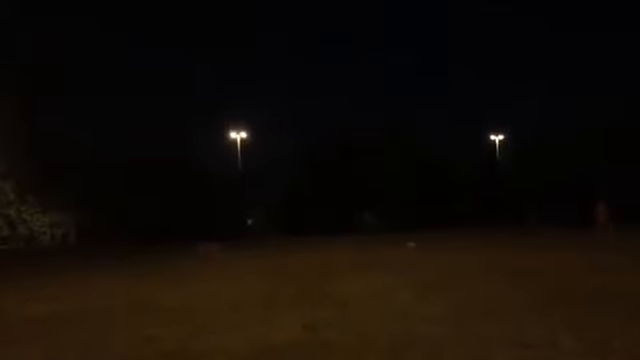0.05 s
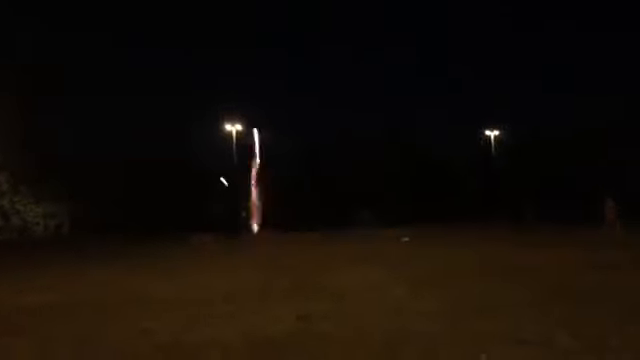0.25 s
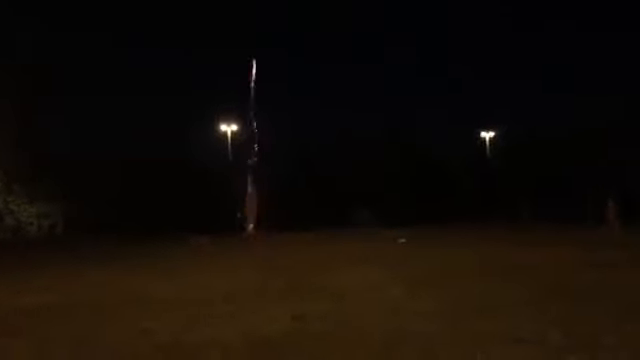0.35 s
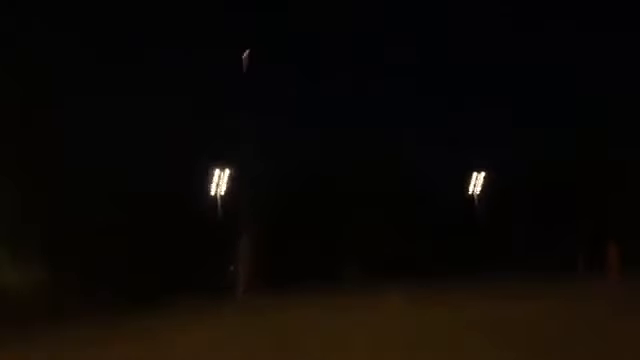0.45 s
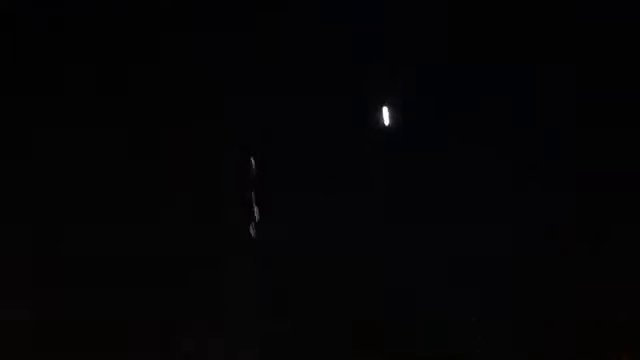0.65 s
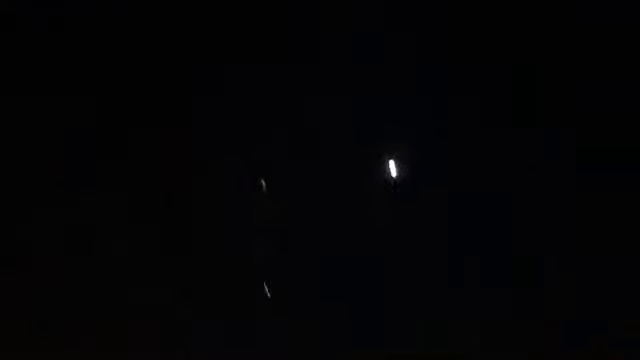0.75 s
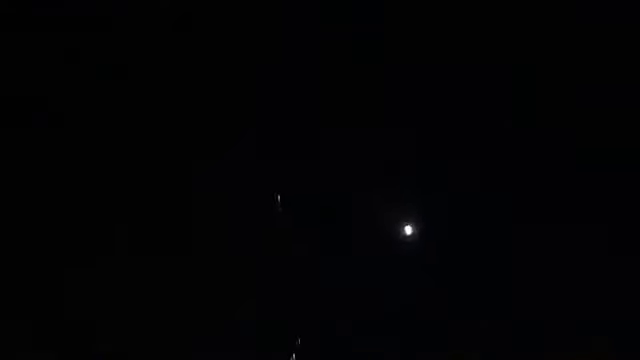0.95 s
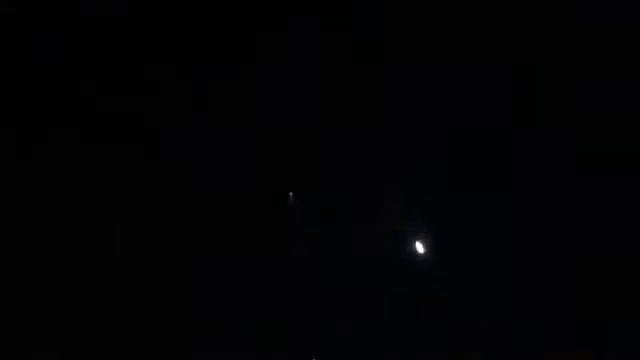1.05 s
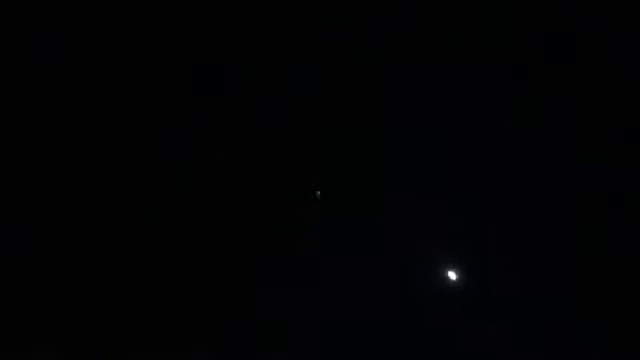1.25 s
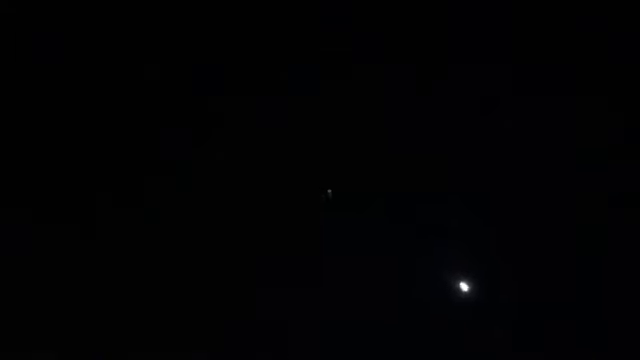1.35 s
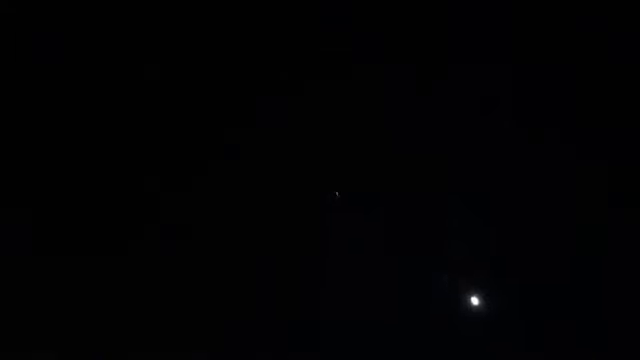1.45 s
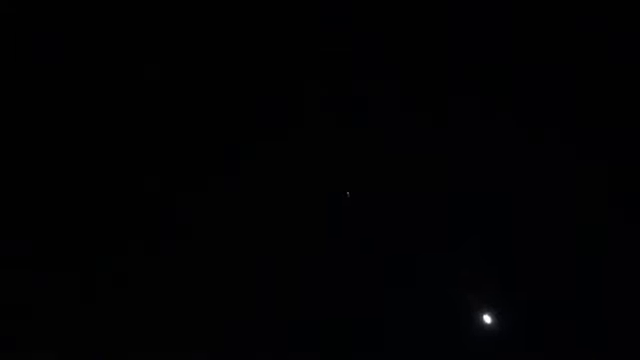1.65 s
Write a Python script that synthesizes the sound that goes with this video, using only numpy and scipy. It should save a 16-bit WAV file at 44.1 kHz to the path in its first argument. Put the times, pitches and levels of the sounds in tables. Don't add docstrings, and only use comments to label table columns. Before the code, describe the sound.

Single loud firework launch shot, cracking over a deep boom, then fading echoes in night air

```python
import sys
import numpy as np
from scipy import signal
from scipy.io import wavfile
from scipy.ndimage import uniform_filter1d

SR = 44100
rng = np.random.default_rng(int(sys.argv[2]) if len(sys.argv) > 2 else 0)


def materialize(psi):
    bounded = np.clip(np.atleast_2d(psi).T, -1, 1)
    quanta = np.round(bounded * 32767).astype(np.int16)
    wavfile.write(sys.argv[1], SR, quanta)


def rack_gain(trim_db):
    fader = np.asarray(trim_db, float)
    return 10 ** (fader / 20)


N = 74970
T = np.arange(N) / SR

# (middle [s], level [dB], half length [s], top of the treble [Hz])
CRACKS = [(0.223, -8.5, 0.0052, 9500), (0.258, -29, 0.00087, 14000), (.262, -15.5, 0.0013, 12000),
          (.2655, -17.5, 0.0015, 13900), (0.275, -41, 0.0037, 14000), (.2912, -26.5, 0.00082, 11900),
          (0.3026, -20, .001, 8750), (0.326, -34, 0.003, 7000), (0.345, -36, 0.0048, 5000),
          (0.438, -26, 0.0017, 4960), (0.474, -21.5, 0.0036, 2970), (0.4844, -23.5, 0.00063, 14900),
          (0.4872, -22, 0.0027, 6000)]
# (frequency [Hz], level [dB])
CRACK_COLOUR = [(300, -35), (900, -14), (1600, -2.5), (2500, -2), (3500, 0.5), (5000, -6), (8000, -18),
                (15000, -9.5)]
# (frequency [Hz], width [Hz], level [dB])
RINGS = [(1610, 247, 2.5), (2520, 360, -8), (3660, 750, -4), (5870, 260, -2)]
# (time [s], level [dB], length [s])
LAUNCH_BOOM = (.2230, 1.8, .0365)
# (time [s], level [dB], length [s])
BOOM_ECHOES = [
    (.3, -19.5, 0.023),
    (0.349, -16.5, 0.017),
    (0.374, -11, 0.012),
    (.445, -18.5, 0.031),
    (.4675, -13, 0.029),
    (.4825, -11.5, 0.031),
    (.541, -20, 0.028),
]
SLAP_TIMES = [.223, .258, .259, .265, .266, .31, .372, .374, .4855, .66, .68, .74, .812, 1.0555, 1.075,
              1.104, 1.135]
# (level [dB], half length [s], frequency [Hz], width [Hz])
SLAPS = [(-27.5, 0.0059, 537, 136), (-24, 0.0019, 1600, 460), (-32, 0.0045, 6360, 700),
         (-25.5, 0.0023, 3480, 206), (-31, 0.0086, 320, 360), (-38, 0.011, 324, 250),
         (-22.5, 0.0041, 1200, 1100), (-28, .003, 724, 200), (-36, 0.0019, 6900, 3300),
         (-41.5, 0.012, 190, 81), (-34, 0.0049, 2670, 280), (-35, .006, 185, 610), (-36, .01, 280, 490),
         (-40, 0.0023, 3380, 1400), (-42.5, 0.016, 253, 75), (-37.5, 0.0052, 1770, 850),
         (-37.5, 0.0051, 430, 300)]
# (middle [s], level [dB], half length [s], frequency
# [Hz])
ROLLS = [
    (.06, -35, .025, 51),
    (0.737, -25, 0.014, 48.7),
    (.855, -28, 0.044, 44),
    (.95, -22.5, 0.0062, 85.5),
    (0.998, -22, 0.028, 41.5),
    (1.084, -26.5, 0.017, 45.4),
    (1.177, -24.5, 0.018, 44),
    (1.247, -21.5, 0.0089, 43),
    (1.394, -24, 0.014, 42),
    (1.511, -30.5, 0.039, 38),
]
# (time [s], level [dB])
WASH_LEVEL = [(.23, -60), (.28, -43.5), (.325, -34.5), (.328, -28), (.39, -27.5), (.41, -33), (.465, -26.5),
              (.5, -30), (.59, -32), (.62, -37), (.83, -35.5), (.95, -40.5), (1.36, -48.5), (1.7, -55)]
# (frequency [Hz], level [dB])
WASH_COLOUR = [(150, -7.5), (450, -15.5), (900, -15.5), (1500, -7), (3750, -10.5), (6500, -21),
               (10000, -25), (15500, -40)]
# (frequency [Hz], change [dB/s])
AIR_LOSS = [(200, 12), (1500, 1.5), (4000, -9.5), (7000, -23.5), (10000, -72), (15000, -100)]
# (time [s], level [dB])
HUM_LEVEL = [(0, -41), (.6, -37.5), (1.2, -43), (1.35, -36.5), (1.7, -34)]
# (multiple of the hum, level facing the lamps [dB], level turned to the sky [dB])
BUZZ = [(45, -74, -84), (46, -69, -76), (47, -71, -75), (48, -69, -68), (49, -81, -84), (50, -80, -85),
        (51, -79, -88), (52, -83, -82)]
TURN_TIMES = (.3, 1.1)
# (time [s], level [dB], frequency [Hz], width [Hz])
TICK = (.1832, -58, 8300, 5000)
# (frequency [Hz], level [dB])
FLOOR_COLOUR = [(88, -26), (150, -7.5), (453, -25.5), (1630, -15.5), (3690, -34.5), (4930, -44.5),
                (5650, -42.5), (6470, -48.5), (15500, -66.5)]
# (time [s], level [dB])
WIND_LEVEL = [(0, -35), (.2, -34.5), (.3, -35.5), (.65, -36.5), (.8, -39), (1.2, -30), (1.5, -34.5),
              (1.7, -38.5)]
# (frequency [Hz], level [dB])
WIND_COLOUR = [(12, -41), (20, -16.5), (49, -2.5), (126, -18), (150, -48), (193, -28.5), (400, -40),
               (520, -38), (880, -120)]

HUM_HZ = 119.97


def shots():
    grit = spray()
    white = rng.standard_normal(N)
    out = np.zeros(N)
    for s, db, length in [LAUNCH_BOOM] + BOOM_ECHOES:
        out += rack_gain(db) * boom(s, length)
    for s, db, length, top_hz in CRACKS:
        dulled = signal.lfilter(*signal.butter(2, top_hz, fs=SR), burst(s, length, grit))
        out += rack_gain(db) * dulled
    for s, (db, length, hz, width) in zip(SLAP_TIMES, SLAPS):
        out += rack_gain(db) * slap(s, length, hz, width, white)
    for s, db, length, hz in ROLLS:
        out += rack_gain(db) * roll(s, length, hz)
    return out


def spray():
    spikes = rack_gain(2.5 * evened(uniform_filter1d(rng.standard_normal(N), size=14)))
    return ring(noise(CRACK_COLOUR, size=256, patchy_db=4.5, flicker_db=-2.5) * spikes)


def ring(x):
    rung = sum(rack_gain(db) * resonate(x, hz, width) for hz, width, db in RINGS)
    return evened(evened(x) + rack_gain(-4.5) * evened(rung))


def burst(s, length, x):
    u = (T - s) / length
    top = np.exp(-u ** 6)
    skirt = 0.074 * np.exp(-abs(u) / 1.2)
    tail = 0.23 * (1 - np.exp(-np.maximum(u, 0))) * np.exp(-abs(u) / 2.7)
    shape = top + skirt + tail
    return x * shape * np.linalg.norm(shape) / np.linalg.norm(x * shape)


def boom(s, length):
    lead_s, zero_s, rise_s = 0.00404, 0.00867, 0.0065
    stretch = 1.457
    u = np.maximum(T - s + lead_s, 1e-5)
    shape = np.exp(-(rise_s / u) ** 6 - (u / length) ** 3.5)
    return shape * np.sin(np.pi * np.log(u / zero_s) / np.log(stretch))


def slap(s, length, hz, width, white):
    x = resonate(white, hz, 2 * width)
    x = resonate(x, hz, width)
    x = resonate(x, hz, width)
    return burst(s, length, x)


def roll(s, length, hz):
    t = T - s
    swell = np.sqrt(2) * np.exp(-(t / length) ** 2 / 2)
    return swell * np.sin(2 * np.pi * hz * t * (1 - 3.4 * t))


def wash():
    x = ring(noise(WASH_COLOUR, size=256, patchy_db=1., flicker_db=.7, drift=AIR_LOSS, since=.36))
    early = x[round(.3 * SR):round(.5 * SR)]
    opening = np.clip((T - .225) / 0.0067, 0, 1)
    return x / np.sqrt(np.mean(early ** 2)) * curve(WASH_LEVEL) * opening


def lamps():
    beat = 2 * np.pi * HUM_HZ * (T - .0085)
    wobble = 6 * resonate(rng.standard_normal(N), 2, 11.6)
    hum = curve(HUM_LEVEL) * np.sin(beat + wobble)
    drift = uniform_filter1d(rng.standard_normal((len(BUZZ), N)), size=1500, axis=1)
    waver = rack_gain(1.9 * evened(drift))
    buzz = np.zeros(N)
    for (multiple, lamp_db, sky_db), w in zip(BUZZ, waver):
        level = rack_gain(np.interp(T, TURN_TIMES, (lamp_db, sky_db)))
        buzz += level * w * np.cos(multiple * beat)
    return np.sqrt(2) * (hum + buzz)


def tick():
    s, db, hz, width = TICK
    t = T - s
    return rack_gain(db) * np.exp(-(t * width) ** 2) * np.sin(2 * np.pi * hz * t) * 3


def traffic():
    return rack_gain(-43.5) * noise(FLOOR_COLOUR, size=1024, patchy_db=2.0, flicker_db=0.7)


def wind():
    return curve(WIND_LEVEL) * noise(WIND_COLOUR, size=2048, patchy_db=0.0, flicker_db=3.0)


def noise(colour, size, patchy_db, flicker_db, drift=((1, 0), (2, 0)), since=0.):
    hop = size / 4
    frames = N * 4 // size + 5
    hz = np.fft.rfftfreq(size, 1 / SR)
    real, imag, patch = rng.standard_normal((frames, len(hz), 3)).T
    patch = uniform_filter1d(patch, size=5, axis=0)
    patch = evened(uniform_filter1d(patch, size=6, axis=1))
    flicker = evened(uniform_filter1d(rng.standard_normal(frames), size=3))
    age = np.maximum(np.arange(frames) * hop / SR - since, 0)
    db = read(colour, hz)[:, None] + read(drift, hz)[:, None] * age
    db = db + patchy_db * patch + flicker_db * flicker
    spectra = (real + 1j * imag) * rack_gain(db)
    return evened(signal.istft(spectra, nperseg=size, noverlap=size * 3 // 4)[1][:N])


def resonate(x, hz, width):
    turn = np.exp(2j * np.pi * hz * np.arange(len(x)) / SR)
    r = np.exp(-np.pi * width / SR)
    return 2 * (turn * signal.lfilter([1 - r], [1, -r], x / turn)).real


def evened(x):
    return x / np.sqrt(np.mean(x ** 2) + 1e-20)


def read(points, hz):
    f, value = np.transpose(points)
    return np.interp(np.log(hz + 1), np.log(f + 1), value)


def curve(points):
    return rack_gain(np.interp(T, *np.transpose(points)))


def scene():
    return (shots() + wash() + lamps() + tick() + traffic() + wind())[None]


def top_cut(x):
    return signal.sosfilt(signal.butter(12, 16330, fs=SR, output="sos"), x)


def record(dry):
    on_s, off_s = .217, .891
    highpass = signal.butter(2, 7000, "high", fs=SR, output="sos")
    hiss = signal.sosfilt(highpass, rng.standard_normal(N))
    steady = rack_gain(-73) * hiss[::-1]
    gate = np.clip((T - on_s) / .002, 0, 1) * np.clip((off_s - T) / .004, 0, 1)
    sizzle = rack_gain(-30 - 250 * abs(T - on_s))
    x = dry + steady + (rack_gain(-61) + sizzle) * hiss * gate

    ceiling = 1.12
    x = x / (1 + abs(x / ceiling) ** 4) ** (1 / 4)

    edge = signal.firwin(255, 15050, window=("kaiser", 7), fs=SR)
    x = np.pad(x, ((0, 0), (127, 127)), "reflect")
    x = signal.oaconvolve(x, edge[None], "valid")
    x = x * np.clip((N / SR - T) / .004, 0, 1)
    return top_cut(x)


dry = scene()
out = record(dry)
materialize(out)
```